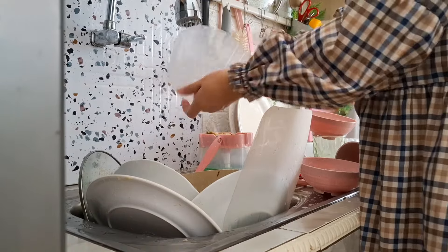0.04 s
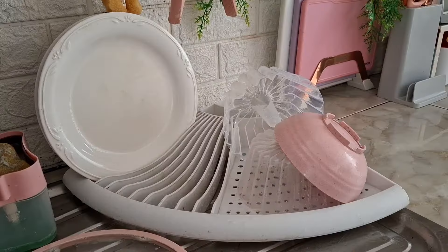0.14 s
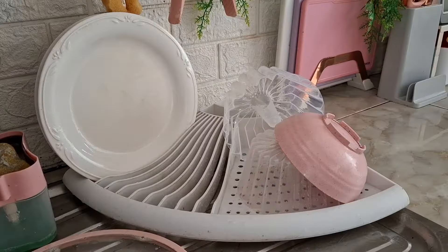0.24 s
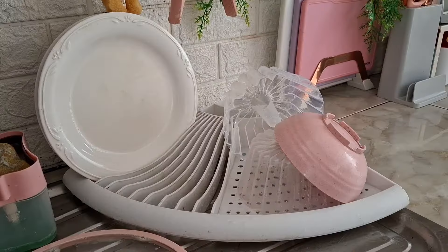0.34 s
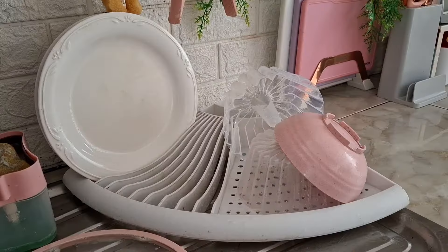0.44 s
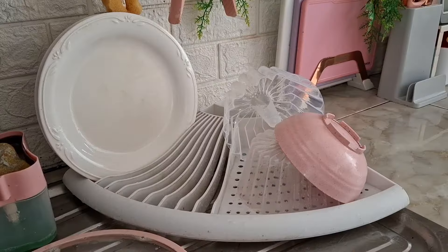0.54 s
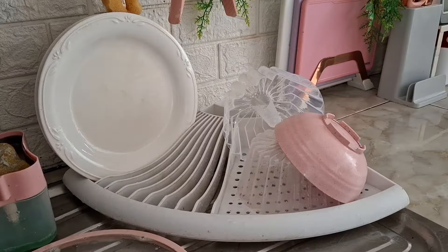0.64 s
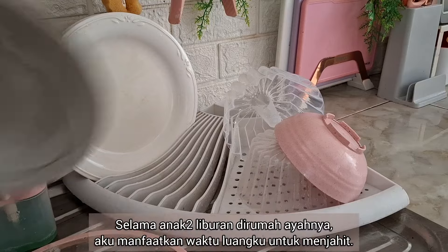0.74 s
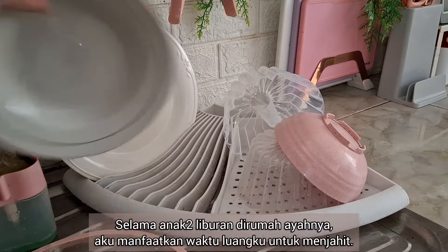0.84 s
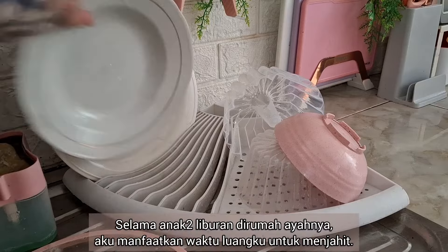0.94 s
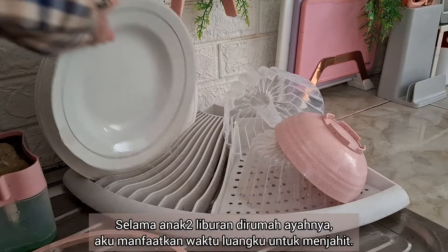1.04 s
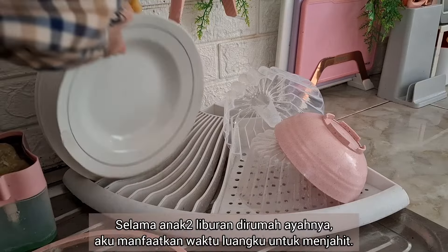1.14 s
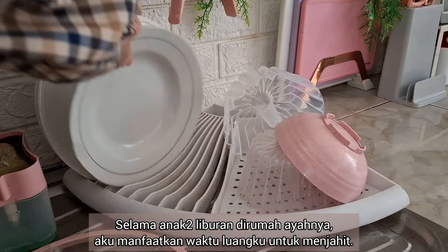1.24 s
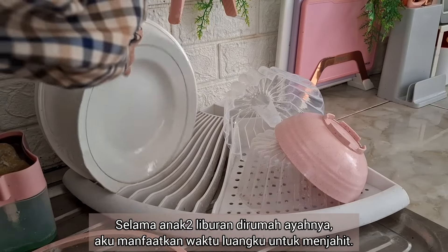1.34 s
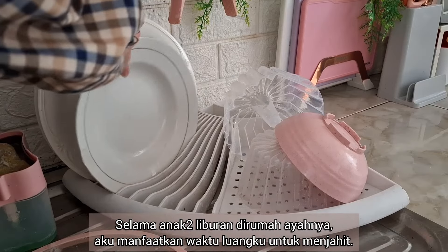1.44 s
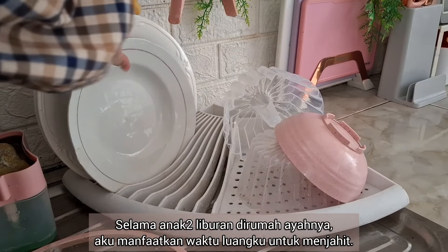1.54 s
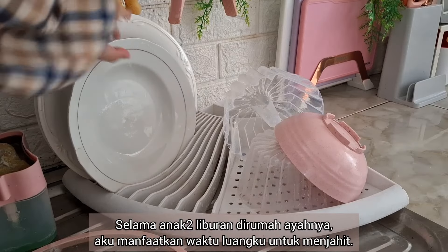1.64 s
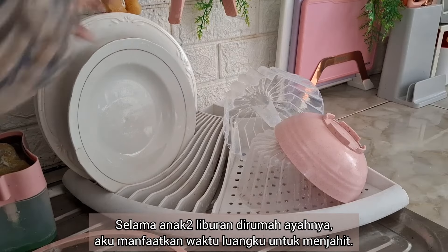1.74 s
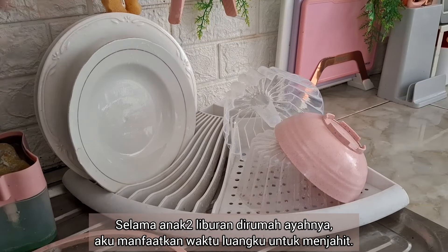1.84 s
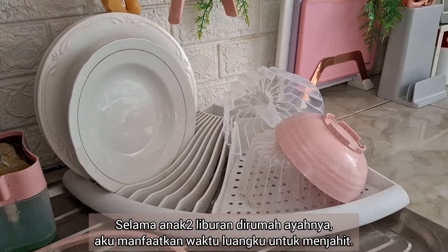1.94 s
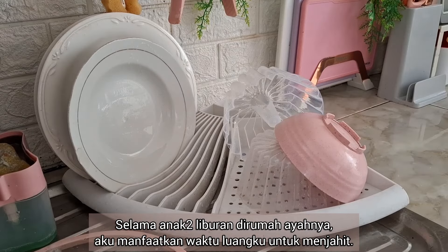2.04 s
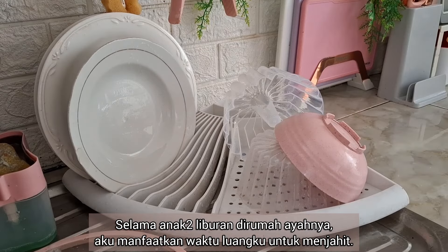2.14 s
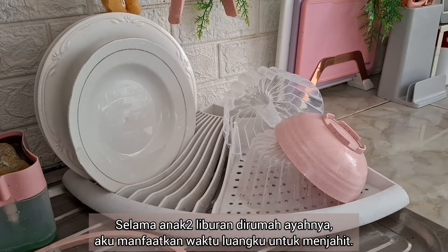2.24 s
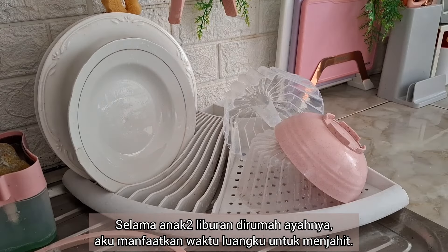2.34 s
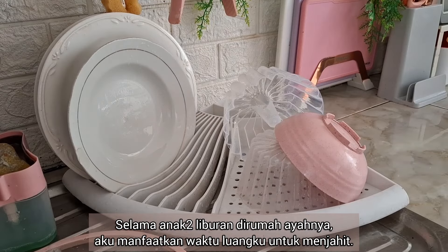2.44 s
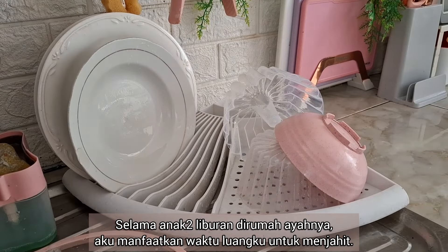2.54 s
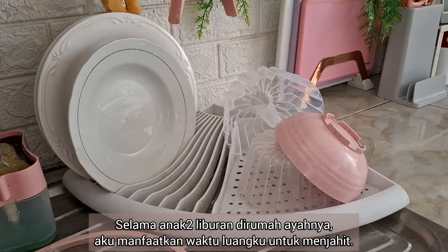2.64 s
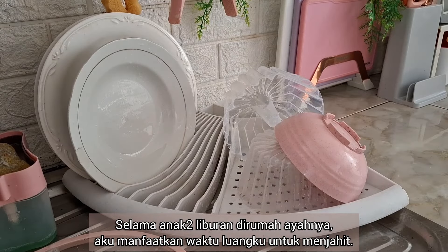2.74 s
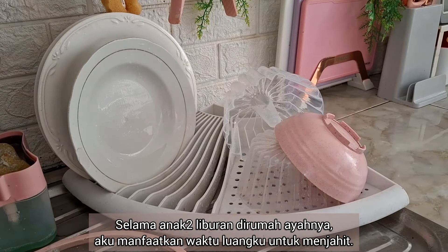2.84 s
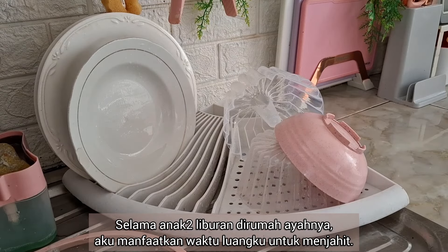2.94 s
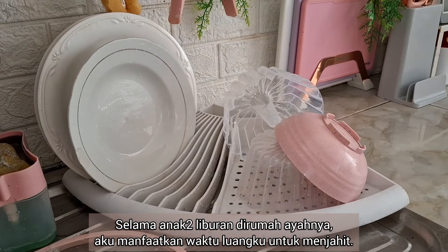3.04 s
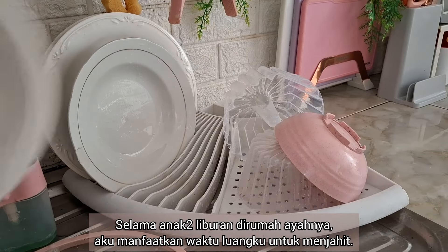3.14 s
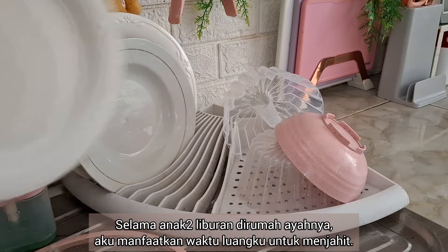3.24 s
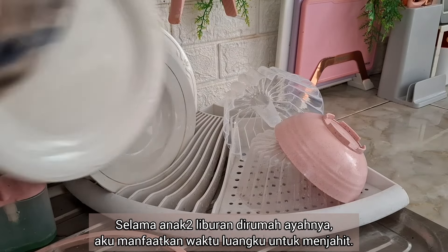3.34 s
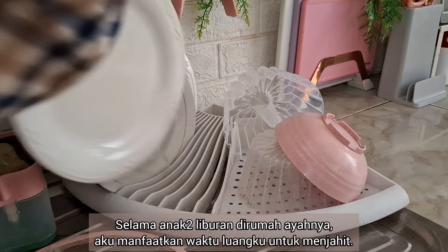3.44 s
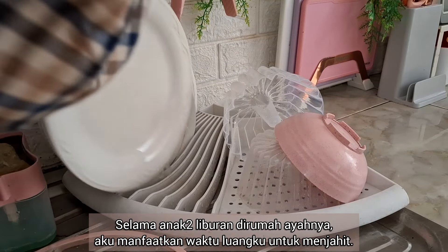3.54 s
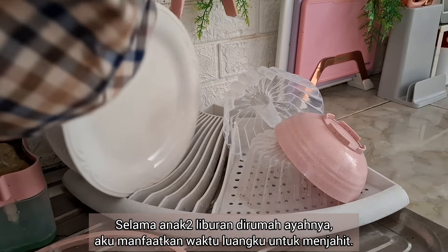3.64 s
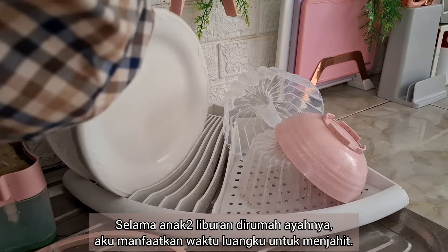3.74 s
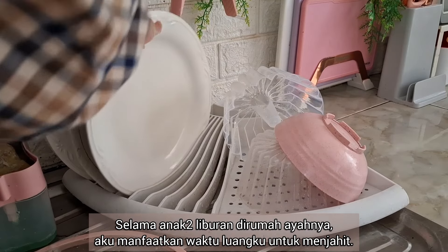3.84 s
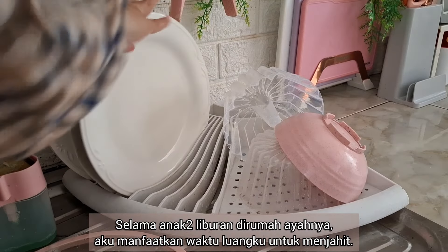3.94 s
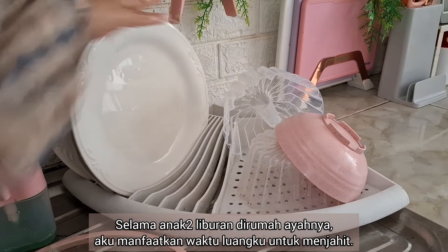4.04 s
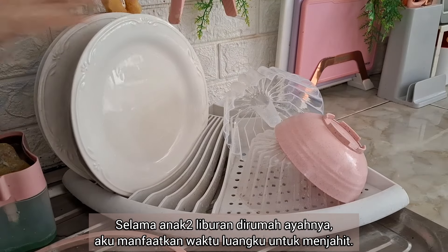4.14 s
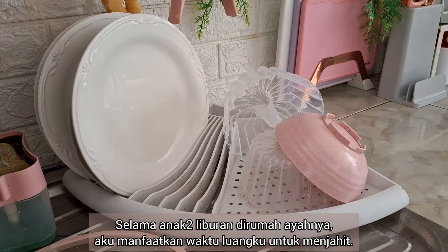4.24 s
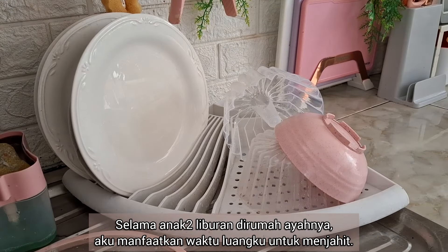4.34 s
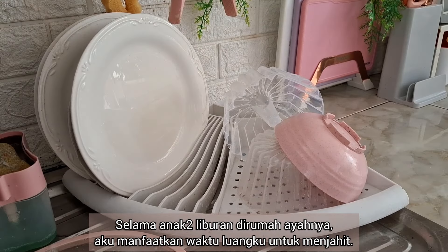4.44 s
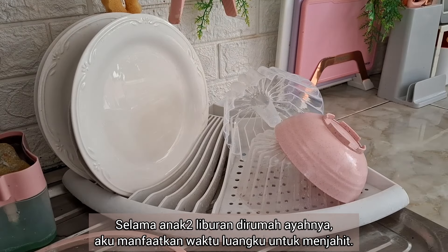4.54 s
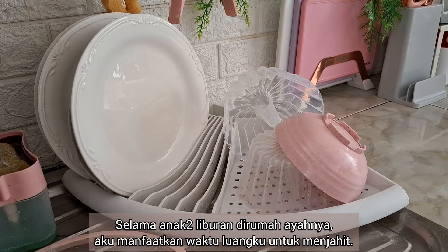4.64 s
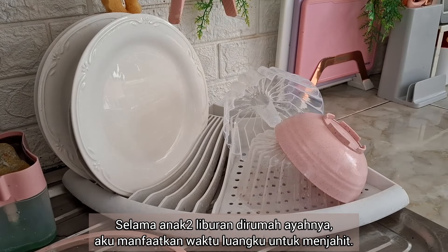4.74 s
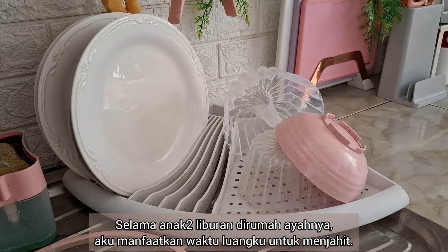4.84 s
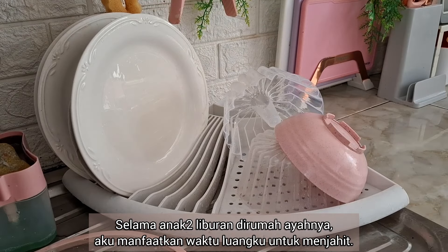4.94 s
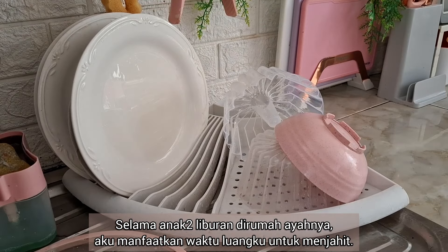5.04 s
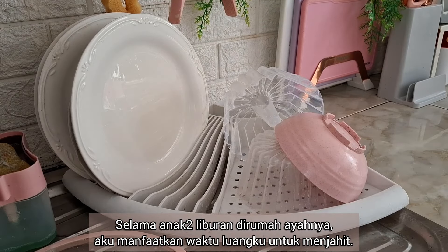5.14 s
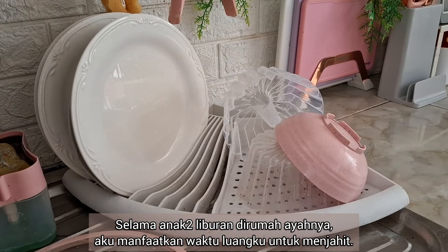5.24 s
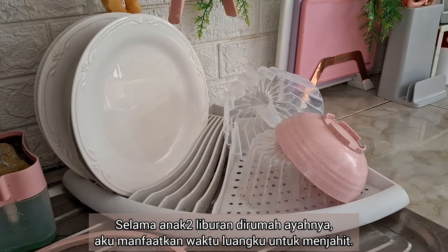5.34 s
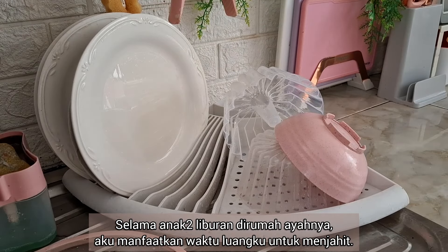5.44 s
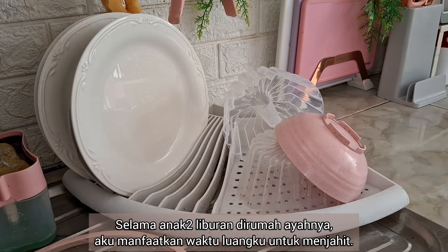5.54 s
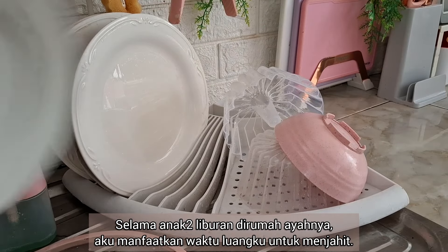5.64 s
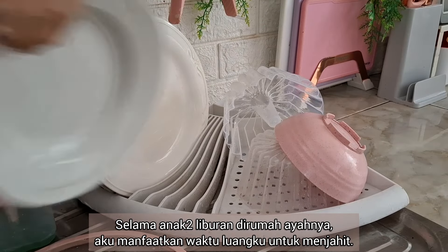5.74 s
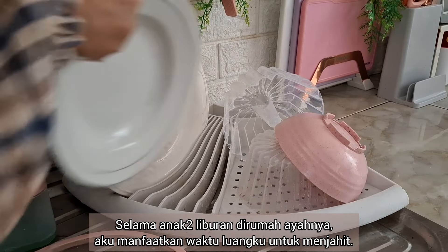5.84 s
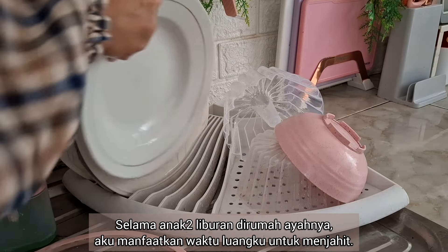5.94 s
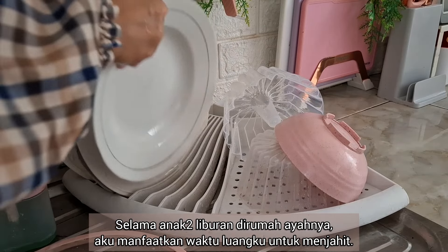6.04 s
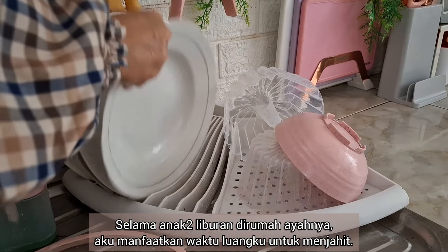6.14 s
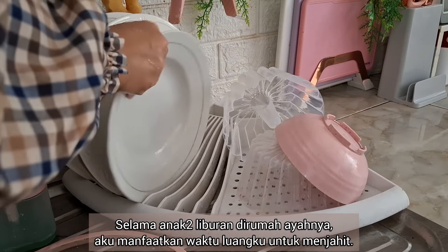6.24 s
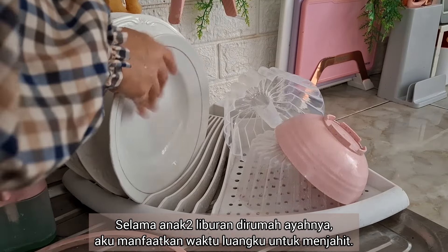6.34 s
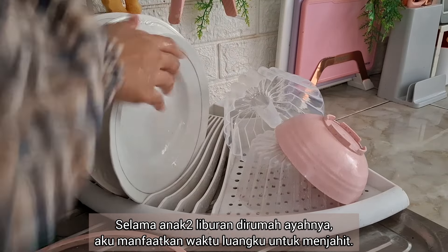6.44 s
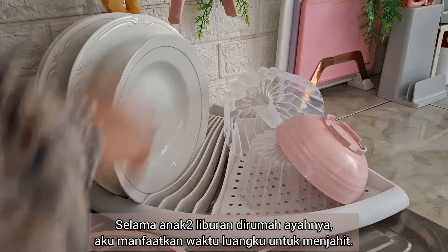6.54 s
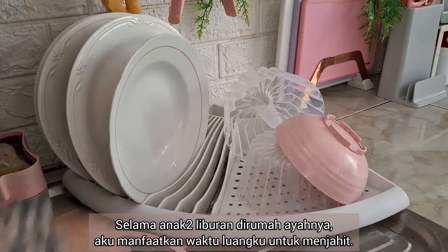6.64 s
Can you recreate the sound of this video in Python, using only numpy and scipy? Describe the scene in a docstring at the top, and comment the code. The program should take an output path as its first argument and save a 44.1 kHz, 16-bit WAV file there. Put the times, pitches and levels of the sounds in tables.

```python
"""Dull bumps at the sink open the scene over a mains hum that lasts throughout; a sleeve rustles.
Then plates are stood in a plastic drying rack in a tiled kitchen, in three groups of knocks.
Each knocks into the ribs, rocks and clinks against its neighbour; rims tick and scrape between.
Blows are noise bursts, decaying modes and short tones; scrapes, rustle and air are coloured noise;
the hum is a sum of sines. Tile reflections follow, then level-dependent gain, clipping and a top cut."""
import sys
import numpy as np
from scipy import signal
from scipy.fft import rfft, irfft, next_fast_len
from scipy.io import wavfile
from scipy.ndimage import uniform_filter1d

SR = 44100
rng = np.random.default_rng(int(sys.argv[2]) if len(sys.argv) > 2 else 0)


def file_out(sig):
    """Save sig as 16-bit WAV at sys.argv[1]."""
    # one column per channel
    cols = np.atleast_2d(sig).T
    # limit, then scale
    lim = np.clip(cols, -1, 1)
    pcm = np.round(lim * 32767).astype(np.int16)
    wavfile.write(sys.argv[1], SR, pcm)


N = 295248
TIME = np.arange(N) / SR

# a plate lands, rocks or drops back: (time [s], strike level [dB], weight on the rack [dB re strike],
#   hardness [dB], looseness [dB], lower note [Hz], its level [dB re strike],
#   upper note [Hz], its level [dB re strike])
PLATE_BLOWS = [(1.271, -33, -4, 5.5, -5, 790, -8, 990, -11.5),
               (1.365, -23, 4, 4.5, -5.5, 413, 10, 2534, -4),
               (1.399, -29, 7.5, -7.5, -6, 450, 10, 584, 6.5),
               (1.582, -17.5, -10, 3, -11.5, 467, 0.5, 974, 0),
               (1.9403, -18, -2.5, 1, -0.5, 486, 10.5, 1913, 2.5),
               (2.1661, -17, -15, 3.5, -29, 529, -3.5, 2070, -9),
               (2.209, -14, -3, -1.5, -10, 428, -0.5, 1042, -5),
               (2.344, -19, -10.5, 2.5, -18, 467, -10, 2050, -4.5),
               (3.676, -23.5, 2, -7.5, -9.5, 457, 3.5, 1040, 2.5),
               (3.734, -24.5, -3.5, -1.5, -11, 473, -4, 1270, 1.5),
               (3.766, -20.5, -8.5, -1.5, -6, 780, -4, 1640, -2),
               (3.813, -14.5, -4.5, -2, -8.5, 446.4, 0, 1290, -5.5),
               (3.881, -23.5, -4, 1, -7, 1246, -6, 5050, -9.5),
               (4.072, -30.5, -10, -1, -3, 890, -15, 1980, -1),
               (4.109, -14.5, -3, 0.5, -12, 624, -4.5, 1700, -3.5),
               (4.298, -22, -3, 5, -8.5, 547, 1, 1870, -10.5),
               (4.435, -23.5, -5, 10, -14.5, 480, -11, 3040, -5),
               (4.511, -28.5, 5, 6.5, -17, 299, 5.5, 730, 0),
               (4.5396, -15.5, -2.5, 4.5, -14.5, 1038, 6.5, 1590, -5),
               (4.587, -21, 2.5, 4.5, -18, 666, -0.5, 1098, 2),
               (4.6634, -15, -9, 0.5, -17, 1176, 3.5, 1635, -8),
               (4.799, -22.5, -17, -4.5, -13.5, 1092, -8.5, 1667, -8.5),
               (6.192, -27.5, 0.5, 4.5, -10, 712, 1, 1353, 1),
               (6.227, -18.5, 3, -1.5, -5, 431, 6.5, 1110, 2),
               (6.3225, -12, 1, -2, -15, 448, -4.5, 2520, -12),
               (6.372, -10.5, -2.5, -0.5, -14.5, 608, -3.5, 1345, -3),
               (6.381, -19.5, -0.5, -1, -12, 988, 2.5, 1863, 2),
               (6.454, -14.5, -8.5, -6, -14.5, 1030, -4, 2620, -14.5)]
# range of a blow's thud: (low [Hz], high [Hz])
THUD_RANGE_HZ = (306.5, 729)


def from_db(db):
    """Decibels to gain."""
    return 10 ** (np.asarray(db) / 20)


def rms_one(x):
    """Scale to rms 1."""
    return x / np.sqrt(np.mean(x ** 2) + 1e-20)


def level(rows, fade_s=0.099):
    """A dB curve as gain in time, fading out beyond its span."""
    s, db = np.transpose(rows)
    span = np.interp(TIME, [s[0] - fade_s, s[0], s[-1], s[-1] + fade_s], [0, 1, 1, 0])
    return span * from_db(np.interp(TIME, s, db))


def at_hz(points, hz):
    """Read a table on a log-frequency axis."""
    points = np.array(points)
    return np.interp(np.log(hz), np.log(points[:, 0]), points[:, 1])


def band(x, edges_hz, order=2):
    """Causal band-pass."""
    return signal.sosfilt(signal.butter(order, edges_hz, "band", fs=SR, output="sos"), x)


def low_or_high_pass(x, edge_hz, order, kind):
    """Causal Butterworth low-pass or high-pass."""
    return signal.sosfilt(signal.butter(order, edge_hz, kind, fs=SR, output="sos"), x)


def add(track, s, sound):
    """Mix a sound in at time s."""
    start = max(round(s * SR), 0)
    track[:, start:start + sound.shape[-1]] += sound[:, :N - start]


def spread(mid, side, hz):
    """Two unrelated signals to left and right, most alike in the bass."""
    # (frequency [Hz], left-right likeness [0-1])
    likeness = [(100, 0.98), (250, 0.39), (450, 0.84), (1000, 0.63), (2500, 0.59), (5000, 0.41)]
    alike = np.clip(at_hz(likeness, hz), 0, 1)
    difference = np.array([[1], [-1]]) * np.sqrt((1 - alike) / 2) * side
    return difference + np.sqrt((1 + alike) / 2) * mid


def noise(colour):
    """Stereo noise with a given spectrum that falls away beyond its ends; rms 1."""
    size = next_fast_len(N)
    hz = np.maximum(np.fft.rfftfreq(size, 1 / SR), 1)
    skirts = np.minimum(1, np.minimum(hz / colour[0][0], colour[-1][0] / hz)) ** 4
    mid, side = rfft(rng.standard_normal((2, size))) * from_db(at_hz(colour, hz)) * skirts
    return rms_one(irfft(spread(mid, side, hz), size)[:, :N])


def flutter(size, per_s, depth_db):
    """An uneven gain, as of rims catching and slipping; rms 1."""
    position = np.arange(size) / SR * per_s
    count = int(position[-1]) + 2
    wander = np.interp(position, np.arange(count), rng.standard_normal(count))
    return rms_one(from_db(depth_db * wander))


def burst(envelope, edges_hz, over_s):
    """Many tiny contacts under an envelope, in one range; as much energy as rms 1 held for over_s."""
    mid, side = band(rng.standard_normal((2, len(envelope))) * envelope, edges_hz, order=3)
    centre_hz = np.sqrt(edges_hz[0] * edges_hz[1])
    return spread(rms_one(mid), rms_one(side), centre_hz) * np.sqrt(over_s * SR / len(envelope))


def ring(t, hz, t60_s, rise_s):
    """A struck mode builds up during the contact and dies away; each ear meets it at its own phase."""
    phase = 2 * np.pi * (hz * t + rng.random())
    tone = spread(np.sin(phase), np.cos(phase) * rng.choice([-1, 1]), hz)
    return np.sqrt(2) * tone * from_db(-60 * t / t60_s) * (1 - np.exp(-t / rise_s))


def contact(t, rise_s):
    """The force of one contact swells and lets go within a few milliseconds."""
    return t ** 2 * np.exp(-t / rise_s)


def shudder(hz, length_s, ear_lag_s=0.00023):
    """A short tone under a half-sine envelope, later in the left ear; peak about 1."""
    t = np.arange(int(length_s * SR)) / SR
    heard_t = t - np.array([[ear_lag_s], [0]])
    return np.sin(np.pi * t / length_s) * np.sin(2 * np.pi * (hz * heard_t + rng.random()))


def hum(level_db=-34.5, waver_db=1.9, mains_hz=49.95):
    """Twice the mains frequency with faint overtones; it wavers slightly."""
    # (multiple of the mains frequency, level [dB re level_db])
    partials = [(2, -1.5), (4, -30.5), (6, -31.5), (14, -34.5), (16, -39)]
    tones = 0
    for k, db in partials:
        tones = tones + from_db(db) * np.sin(2 * np.pi * (round(k) * mains_hz * TIME + rng.random()))
    return from_db(level_db) * np.sqrt(2) * tones * flutter(N, per_s=14, depth_db=waver_db)


def room_air(air_db=-0.5, rumble_db=-59.0):
    """The air of the room as coloured noise of changing level, over a steady low rumble."""
    # (time [s], level [dB re air_db])
    air_level = [(0, -61), (1.0, -52.5), (3.5, -55), (5.1, -61), (6.69, -53.5)]
    # (frequency [Hz], relative density [dB per Hz])
    air_colour = [(140, -33.5), (230, -12), (301, -15.5), (637, -14), (718, -14.5), (1090, -18.5),
                  (2500, -26), (3250, -39.5), (5500, -120)]
    # (frequency [Hz], relative density [dB per Hz])
    rumble_colour = [(20, -19.5), (60, 5.5), (130, 9), (250, -15)]
    air = from_db(air_db) * level(air_level) * noise(air_colour)
    return air + from_db(rumble_db) * noise(rumble_colour)


def swells(width_hz=30):
    """A narrow low band of noise comes and goes."""
    # (time [s], centre [Hz], level [dB], half length [s])
    drones = [(0.893, 238, -54, 0.15), (2.556, 201, -46.5, 0.13)]
    out = 0
    for s, hz, db, half_s in drones:
        drone = rms_one(band(rng.standard_normal(N), (hz - width_hz / 2, hz + width_hz / 2)))
        out = out + from_db(db) * drone * np.exp(-((TIME - s) / half_s) ** 2)
    return out


def sink_handling():
    """Handling at the sink: mostly low noise that dies down."""
    # (time [s], level [dB])
    handling = [(0, -26), (.05, -30.5), (.16, -32.5), (.18, -41), (.3, -44.5)]
    # (frequency [Hz], relative density [dB per Hz])
    sink_colour = [(25, -25), (69, -2.5), (105, 1.5), (199, -8), (350, -22.5), (602, -22), (921, -15),
                   (1310, -26.5), (3300, -32), (4570, -35), (6990, -54), (9090, -85)]
    return level(handling) * noise(sink_colour)


def thumps(hz=105, length_s=0.017):
    """Something heavy bumps in the sink and the basin gives a short low thump."""
    # (time [s], peak level [dB])
    bumps = [(0.074, -22), (0.155, -20.5)]
    out = np.zeros((2, N))
    for s, db in bumps:
        add(out, s, from_db(db) * shudder(hz, length_s))
    return out


def sleeve(rustle_db=-6.5, still_db=-58, attack_s=0.063, release_s=0.11,
           swish_db=3, swish_at_s=0.18, swish_width_s=0.067):
    """Cloth rustle rises with each reach, swishes, holds while the arm moves and dies away."""
    # the arm moves: (start [s], length [s], level [dB re rustle_db])
    reaches = [(0, 0.31, -56.5), (0.57, 0.055, -51), (0.677, 1.9, -45), (3.048, 1.7, -45),
               (5.317, 0.099, -46.5), (5.58, 0.99, -46)]
    # (frequency [Hz], relative density [dB per Hz])
    rustle_colour = [(900, -10), (2300, -8.5), (2600, -1.5), (2900, -6.5), (4000, -5), (4750, -6.5),
                     (5300, -4.5), (5750, -11), (6300, -15.5), (9000, -49.5)]
    moving = from_db(still_db)   # hiss when the arm rests
    for s, length_s, db in reaches:
        rise = np.clip((TIME - s) / attack_s, 0, 1)
        # the arm is fastest early in a reach
        boost_db = swish_db * np.exp(-((TIME - s - swish_at_s) / swish_width_s) ** 2)
        fall = np.exp(-np.maximum(TIME - s - length_s, 0) / release_s)
        moving = np.hypot(moving, from_db(db + boost_db) * rise * fall)
    rustle = from_db(rustle_db) * moving * noise(rustle_colour)
    return rustle * flutter(N, per_s=82, depth_db=1.5) * flutter(N, per_s=10, depth_db=1)


def kitchen(x, wet_db=-10.5, build_up_s=0.0047):
    """Dense reflections off tiles: noise with a decay time for each octave."""
    # (frequency [Hz], t60 [s])
    kitchen_t60 = [(100, 0.14), (500, 0.49), (1500, 0.35), (3000, 0.54), (7000, 0.094)]
    t, response = np.arange(SR) / SR, 0
    edges_hz = 45 * 2. ** np.arange(9)
    for low, high in zip(edges_hz, edges_hz[1:]):
        hz = np.sqrt(low * high)
        mid, side = band(rng.standard_normal((2, SR)), (low, high))
        response = response + spread(mid, side, hz) * from_db(-60 * t / at_hz(kitchen_t60, hz))
    response = response * (1 - np.exp(-t / build_up_s)) / np.sqrt(SR * 0.02)
    return from_db(wet_db) * signal.fftconvolve(x, response, axes=1)[:, :N]


def dull(x, top_hz=7600, order=5):
    """The microphone loses the top of the clatter."""
    return low_or_high_pass(x, top_hz, order, "low")


def sways(range_hz=(55, 175), t60_s=0.79):
    """The rack takes a plate's weight and wobbles on the counter with a dull rumble."""
    # (time [s], level [dB])
    wobbles = [(1.95, -35.5), (2.208, -37), (3.821, -45), (4.511, -40.5), (6.24, -37.5)]
    out, t = np.zeros((2, N)), np.arange(SR) / SR
    for s, db in wobbles:
        add(out, s, from_db(db) * burst(from_db(-60 * t / t60_s), range_hz, over_s=0.1))
    return out


def scrapes(gain_db=2.5, grain_db=2.3):
    """Rims slide along the plastic ribs, catching lightly."""
    # one table per stroke: (time [s], level [dB re gain_db])
    strokes = [
        [(1.45, -54), (1.9, -48)],
        [(2.01, -28), (2.11, -38), (2.214, -31), (2.6, -55)],
        [(3.76, -39), (3.832, -52.5), (4.26, -48), (4.34, -30), (4.5, -41.5)],
    ]
    # (frequency [Hz], relative density [dB per Hz])
    scrape_colour = [(200, -10.5), (480, 3.5), (800, 2), (1200, -2.5), (2800, -9), (4500, -16), (6500, -40)]
    pressure = sum(level(stroke) for stroke in strokes)
    catching = flutter(N, per_s=260, depth_db=grain_db)
    return from_db(gain_db) * pressure * noise(scrape_colour) * catching


def touches(tick_hz=(900, 3500), contact_s=0.0012, spread_share=0.11):
    """A brushed rim gives a small tick and one gritty note that the fingers soon damp."""
    # (time [s], tick level [dB], note [Hz], note level [dB re tick], note t60 [s])
    brushes = [(0.223, -56, 1395, 19.5, 0.086), (0.724, -39, 2510, -6, .07), (1.304, -37, 5200, 0.5, 0.033),
               (1.911, -33, 430, -12, .07), (2.374, -30, 2080, 5.5, 0.12), (2.854, -51, 4900, 10, .01),
               (2.961, -37.5, 2450, -1, 0.079), (3.653, -35, 1670, 9, 0.073),
               (3.982, -38, 3780, 9.5, 0.032), (5.22, -50.5, 4960, -3, .03),
               (5.754, -50.5, 3900, 14, 0.095)]
    out, t = np.zeros((2, N)), np.arange(SR // 4) / SR
    for s, db, hz, note_db, t60_s in brushes:
        held = from_db(-60 * t / t60_s) * (1 - np.exp(-t / contact_s))
        tick = burst(contact(t, contact_s), tick_hz, over_s=0.0039)
        ping = burst(held, (hz * (1 - spread_share), hz * (1 + spread_share)), over_s=0.0026)
        add(out, s, from_db(db) * (tick + from_db(note_db) * ping))
    return out


def overtones(level_db=-29, t60_s=0.1, count=16):
    """Every blow wakes the same weak high overtones of glazed china at random strengths, the highest least."""
    # (low [Hz], high [Hz])
    overtone_range_hz = (1891, 4980)
    out, t = np.zeros((2, N)), np.arange(SR // 5) / SR
    pitches = np.geomspace(*overtone_range_hz, count) * rng.uniform(.97, 1.03, count)
    for s, strike_db, _, hard_db, *_ in PLATE_BLOWS:
        chime = 0
        for hz in pitches:
            chime = chime + rng.rayleigh() * pitches[0] / hz * ring(t, hz, t60_s, rise_s=0.002)
        add(out, s, from_db(strike_db + hard_db + level_db) * chime)
    return out


def shudders():
    """A plate pressed on rack or neighbour shudders at one pitch: a clack or a thud."""
    # (time [s], peak level [dB], pitch [Hz], length [s])
    presses = [(3.679, -16.5, 474, 0.012), (4.5132, -8.5, 490, 0.0027), (4.5405, -2, 1099, .0035),
               (4.563, -14.5, 1040, 0.011), (4.6632, -6, 1162, .0085), (6.228, -7.5, 426, .016),
               (6.3738, -3.5, 1297, 0.0039)]
    out = np.zeros((2, N))
    for s, db, hz, length_s in presses:
        add(out, s, from_db(db) * shudder(hz, length_s))
    return out


def note(t, hz, freedom, gripped_t60_s=0.09, free_t60_s=0.19, free_db=-9.0, split=0.041,
         damping=0.46, buzz_db=1.5, rocking_pitch_db=0.28):
    """A mode is a close pair: one dies fast on the rack, a weaker one wavers and buzzes as the plate rocks."""
    shorter = (hz / THUD_RANGE_HZ[0]) ** -damping   # high notes are damped sooner
    twin_hz = hz * (1 + split * rng.uniform(-.6, 1.3))
    wavering_t = np.cumsum(flutter(len(t), per_s=140, depth_db=rocking_pitch_db)) / SR
    twin = ring(wavering_t, twin_hz, free_t60_s * freedom, rise_s=0.0021)
    twin = twin * flutter(len(t), per_s=240, depth_db=buzz_db)
    gripped = ring(t, hz, gripped_t60_s * shorter * freedom, rise_s=0.00087)
    return gripped + from_db(free_db) * twin


def crack(size, range_hz=(1800, 4000), at_s=0.0032):
    """Glaze meets glaze: one sharp pulse near the height of contact; energy of rms 1 for a millisecond."""
    pulse = band(1.0 * (np.arange(size) == round(at_s * SR)), range_hz, order=3)
    return rms_one(pulse) * np.sqrt(SR / 1000 / size)


def blows(contact_s=0.0013, rattle_t60_s=0.22, note_db=1.0, stack_db=-3.0, clink_db=-7.5, snap_db=-13.5,
          crack_db=-8, rattle_grain_db=2.4, weight_damping=0.24, easy_weight_db=-9,
          contact_briefer=0.15, rattle_db_per_octave=0.2):
    """A sharp contact, a dying rattle of the rim in the ribs, two plate notes and the ring of the stack."""
    # the rack and the plates in it: (frequency [Hz], level [dB re blow and stack_db], t60 [s])
    stack_modes = [(204.5, -25.5, 0.23), (484.8, -15.5, 0.3), (778, -17, 0.33), (1013, -16.5, 0.22),
                   (1282, -19, 0.26), (1675, -21.5, 0.15), (1866, -24.5, 0.13), (2490, -25, 0.3),
                   (2800, -21.5, 0.24), (3700, -20.5, 0.1), (4430, -28, 0.22), (4980, -25.5, 0.27)]
    # knock, clink and its crisp top: (low [Hz], high [Hz])
    knock_hz = (693, 2092)
    clink_hz = (1980, 3884)
    snap_hz = (3580, 5620)
    out, t = np.zeros((2, N)), np.arange(SR // 2) / SR
    ranges = [THUD_RANGE_HZ, knock_hz, clink_hz, snap_hz]
    centres_hz = np.sqrt(np.prod(ranges, axis=1))
    dying = from_db(-60 * t / rattle_t60_s) * (1 - np.exp(-t / 0.0049))
    for s, strike_db, weight_db, hard_db, loose_db, lower_hz, lower_db, upper_hz, upper_db in PLATE_BLOWS:
        strengths_db = [weight_db, 0, hard_db + clink_db, hard_db + snap_db]
        rattle = dying * flutter(len(t), per_s=380, depth_db=rattle_grain_db)
        grit = flutter(len(t), per_s=1400, depth_db=2.0)   # the glaze catches unevenly
        # a plate pressed harder into the rack rings shorter
        freedom = from_db(-weight_damping * max(weight_db - easy_weight_db, 0))
        lower = from_db(lower_db) * note(t, lower_hz, freedom)
        upper = from_db(upper_db) * note(t, upper_hz, freedom)
        sound = from_db(note_db) * (lower + upper) + from_db(hard_db + crack_db) * crack(len(t))
        for edges_hz, height, db in zip(ranges, centres_hz / centres_hz[1], strengths_db):
            # higher ranges: briefer contact, rattle changed by rattle_db_per_octave
            force = contact(t, contact_s * height ** -contact_briefer)
            hit = burst(grit * force, edges_hz, over_s=0.0029)
            chatter_db = loose_db + rattle_db_per_octave * np.log2(height)
            chatter = from_db(chatter_db) * burst(rattle, edges_hz, over_s=0.018)
            sound += from_db(db) * (hit + chatter)
        # a soft landing wakes the low modes, a hard one the high; grip and contact point vary them
        drive = list(zip(centres_hz, strengths_db))
        for hz, db, t60_s in stack_modes:
            shift, chance_db = rng.normal([1, 0], [.02, 2.5])
            mode_db = at_hz(drive, hz) + db + stack_db + chance_db
            sound += from_db(mode_db) * ring(t, hz * shift, t60_s, rise_s=0.00054)
        add(out, s, from_db(strike_db) * sound)
    return out


def scene(left_db=1.0):
    """All sources, leaning a little to the left."""
    plates = blows() + shudders() + overtones() + touches()
    rack = dull(plates + kitchen(plates) + scrapes()) + sways()
    surroundings = sleeve() + room_air() + sink_handling() + thumps() + swells() + hum()
    return (rack + surroundings) * from_db([[left_db], [-left_db]])


def suppress(x, above_hz=300, threshold_db=-48.5, slope=0.35, window_s=0.032):
    """A noise suppressor turns everything down while little is heard above the hum."""
    heard = low_or_high_pass(x.mean(axis=0), above_hz, 4, "high")
    power = np.abs(uniform_filter1d(heard ** 2, int(window_s * SR)))
    heard_db = 10 * np.log10(power + 1e-12)
    return x * from_db(slope * np.minimum(heard_db - threshold_db, 0))


def limit(x, threshold_db=-0.5, slope=0.7, release_db_per_s=90, attack_s=0.0048):
    """After the hardest knocks the gain drops and recovers, taking hum and tails with it."""
    over_db = np.maximum(20 * np.log10(np.abs(x).max(axis=0) + 1e-9) - threshold_db, 0)
    release_db = release_db_per_s * TIME
    held_db = np.maximum.accumulate(over_db + release_db) - release_db
    keep = np.exp(-1 / (attack_s * SR))
    return x * from_db(-slope * signal.lfilter([1 - keep], [1, -keep], held_db))


def record(dry, cutoff_hz=15800):
    """The pauses sink, the hardest knocks duck the gain and overload; the top is cut."""
    overloaded = np.clip(limit(suppress(dry)), -.97, .97)
    return signal.sosfilt(signal.cheby2(12, 70, cutoff_hz, fs=SR, output="sos"), overloaded)


dry = scene()
out = record(dry)
file_out(out)
```